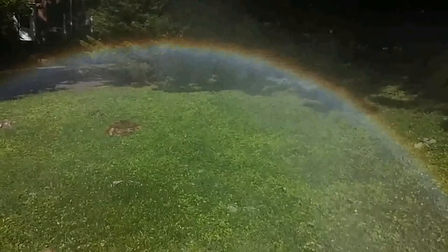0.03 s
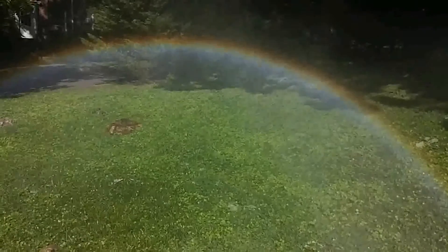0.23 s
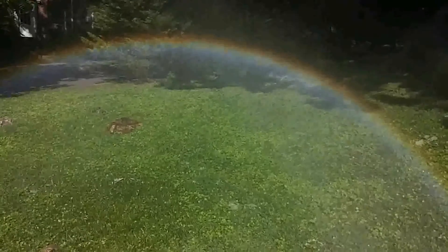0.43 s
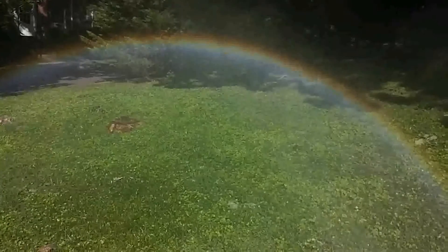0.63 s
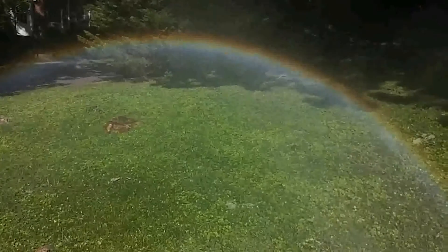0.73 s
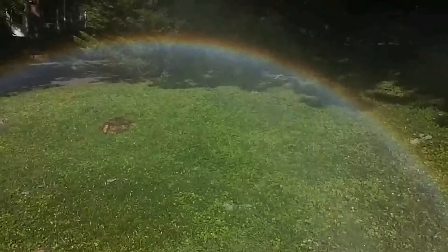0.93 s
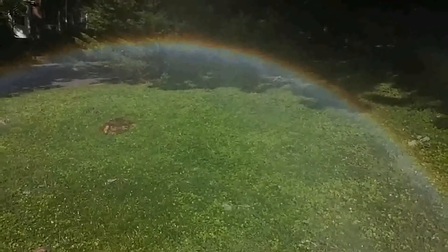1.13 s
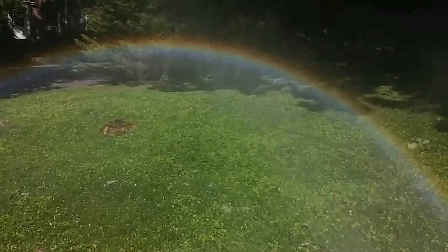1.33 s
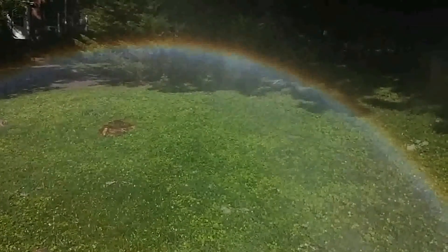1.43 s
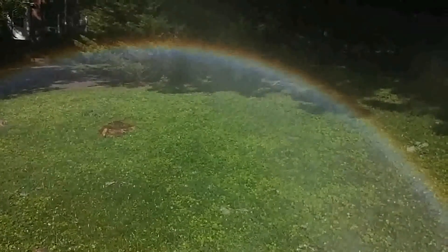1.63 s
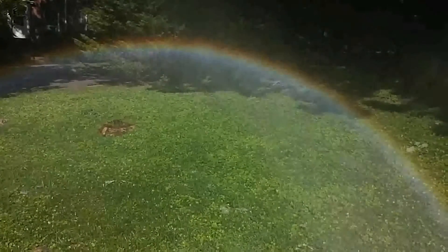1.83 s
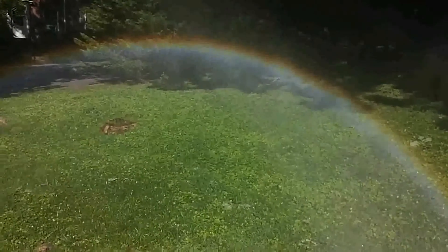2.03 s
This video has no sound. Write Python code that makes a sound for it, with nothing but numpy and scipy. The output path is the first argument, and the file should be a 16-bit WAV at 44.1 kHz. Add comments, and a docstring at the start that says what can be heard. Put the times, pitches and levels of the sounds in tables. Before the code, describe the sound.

Steady sprinkler hiss with drops pattering on a lawn and a light breeze.

```python
"""A lawn sprinkler throws a fine spray over grass. Countless droplets merge into a steady hiss,
heavier drops spatter with a short hollow ring, and the splashing swells as the spray drifts closer.
Behind it are a distant outdoor hum and three faint whistles. A light breeze rumbles on a hand-held
recorder whose two microphone openings colour the sound differently."""
import sys
import numpy as np
from scipy import signal
from scipy.fft import rfft, irfft
from scipy.io import wavfile
from scipy.ndimage import uniform_filter1d, map_coordinates

SR = 44100
rng = np.random.default_rng(int(sys.argv[2]) if len(sys.argv) > 2 else 0)


def bounce(signal):
    """Save signal as a 16-bit WAV file at the path given by the first command-line argument."""
    frames = np.transpose(np.atleast_2d(signal))
    limited = np.clip(frames, -1, 1)
    pcm = np.round(limited * 32767).astype(np.int16)
    wavfile.write(sys.argv[1], SR, pcm)


N = 91860
TIME = np.arange(N) / SR


def undb(db):
    """Turn decibels into a number to multiply by."""
    return 10 ** (np.asarray(db) / 20)


def curve(rows):
    """A changing volume, drawn through (seconds, dB) points."""
    return undb(np.interp(TIME, *np.array(rows).T))


def colour(x, rows):
    """Make some frequencies louder and others softer, following (Hz, dB) points."""
    hz, db = np.array(rows).T
    freqs = np.maximum(np.fft.rfftfreq(N, 1 / SR), 1)
    return irfft(rfft(x) * undb(np.interp(np.log(freqs), np.log(hz), db)), N)


def shaped(x, rows):
    """Give white sound of level 1 the tone set by (Hz, dB per Hz) points."""
    return colour(x, rows) * np.sqrt(SR / 2)


def wobble(per_s):
    """Glide to a new random value per_s times a second; typical size 1."""
    step = int(SR / per_s)
    held = np.repeat(rng.standard_normal(N // step + 1), step)
    glide = uniform_filter1d(held, step)[:N]
    return glide / glide.std()


def wide(make, shared):
    """A wide sound: the shared part reaches both sides, the rest only one."""
    return np.sqrt(shared) * make() + np.sqrt(1 - shared) * np.array([make(), make()])


def noise():
    """White noise of level 1."""
    return rng.standard_normal(N)


def impacts(per_s, spread_db):
    """Randomly timed clicks of uneven size; overall level 1."""
    clicks = (rng.random(N) < per_s / SR) * np.sign(noise()) * undb(spread_db * noise())
    return clicks / clicks.std()


def patchy(x, db, patch_hz=170, patch_s=.022):
    """Let narrow frequency bands flicker, each on its own, keeping the average power."""
    freqs, times, bands = signal.stft(x, SR, nperseg=512)
    grid = np.meshgrid(freqs / patch_hz, times / patch_s, indexing="ij")
    flicker = map_coordinates(rng.standard_normal((256, 256)), grid, order=1, mode="wrap")
    gain = undb(db * flicker / flicker.std())
    return signal.istft(bands * gain / np.sqrt(np.mean(gain ** 2)), SR)[1][..., :N]


# The tone of the settled mist. Each row: frequency in Hz, strength in dB per Hz.
MIST_TONE = [(300, -105), (750, -82), (1000, -75.5), (1300, -77.5), (1600, -74.5), (1900, -74),
             (2150, -69.5), (2450, -63), (2750, -69.5), (3300, -71), (4000, -75), (5000, -73.5),
             (6000, -76.5), (6800, -74), (7350, -67.5), (8200, -71.5), (9000, -66.5), (10200, -73.5),
             (11200, -71), (13200, -73), (14600, -71.5), (15800, -75.5)]
# The slight rise and fall of its hiss. Each row: time in seconds, level change in dB.
MIST_SWELL = [(0, .4), (.08, 1.3), (.65, .4), (1.15, -.8), (1.35, -.2), (2.08, -.4)]


def mist(start_sharp=.055, settle_s=.35):
    """Fine droplets merge into a flickering hiss whose tone sinks as the jet settles."""
    droplets = wide(lambda: impacts(per_s=30000, spread_db=2) + noise(), shared=.51) / np.sqrt(2)
    freqs, times, bands = signal.stft(droplets, SR, nperseg=512)
    hz, db = np.array(MIST_TONE).T
    pitch_ratio = 1 + start_sharp * np.exp(-times / settle_s)
    band_db = np.interp(np.log((freqs[:, None] + 1) / pitch_ratio), np.log(hz), db)
    hiss = signal.istft(bands * undb(band_db) * np.sqrt(SR / 2), SR)[1][:, :N]
    flicker_db = .41 * (wobble(per_s=29.85) + wobble(per_s=200))
    return patchy(hiss, db=1.9) * curve(MIST_SWELL) * undb(flicker_db)


def ring(t, usual_hz=2407, scatter=.042, attack_s=.00043, decay_s=.0034):
    """One drop's hollow ring, t seconds after it lands; each drop has its own pitch."""
    t = np.maximum(t, 0)
    hz = usual_hz * (1 + scatter * rng.standard_normal())
    envelope = np.exp(-t / decay_s) * (1 - np.exp(-t / attack_s))
    return envelope / envelope.max() * np.sin(2 * np.pi * hz * t)


def drop_rings(per_s=600, spread_db=4.5):
    """Many drops of uneven size ring at random moments; overall level 1."""
    t = TIME[:512]
    drops = np.zeros(N + len(t))
    for start in rng.integers(0, N, int(per_s * N / SR)):
        drops[start:start + len(t)] += undb(spread_db * rng.standard_normal()) * ring(t)
    return drops[:N] / drops.std()


# Flurries of heavier drops. Each row: time in seconds, level in dB before the boost.
FLURRIES = [(0, -46), (.16, -45.5), (.23, -39), (.3, -52), (.42, -48), (.53, -45), (.56, -33.5), (.66, -40),
            (.72, -46), (.85, -54.5), (.94, -37.5), (1.05, -40), (1.34, -47), (1.4, -40), (1.5, -43),
            (1.8, -37), (1.93, -42), (1.99, -37), (2.08, -46)]


def spatter(boost_db=3.5):
    """The heavier drops come down in flurries."""
    return wide(drop_rings, shared=.95) * curve(FLURRIES) * undb(boost_db)


# The tones of dull and bright splashing. Each row: frequency in Hz, strength in dB per Hz.
DULL_TONE = [(700, -99), (1050, -68.5), (1350, -71), (1650, -64.5), (1950, -70), (2250, -62), (2700, -75),
             (4000, -82)]
BRIGHT_TONE = [(1800, -92.5), (2700, -69), (3250, -61), (3900, -71.5), (5000, -76), (6800, -81),
               (7300, -65.5), (7900, -80), (9000, -87)]
# How each one surges. Each row: time in seconds, level change in dB.
DULL_SWELL = [(0, -16.5), (1.25, -8.5), (1.41, -5), (1.51, -8), (1.63, -8), (1.69, -1), (1.77, -6.5),
              (1.87, -2), (1.96, -0.5), (2.08, -4)]
BRIGHT_SWELL = [(0, -15), (1.36, -12), (1.43, 0), (1.5, -9.5), (1.62, -3.5), (1.67, -7), (1.71, -4.5),
                (1.8, 1), (1.88, -3), (2.03, -3.5), (2.08, 2)]


def splashing(tone, swell):
    """Coarser spray lands on the nearby grass in sputtering surges."""
    hits = wide(lambda: impacts(per_s=6500, spread_db=2), shared=.39)
    return patchy(shaped(hits, tone), db=2.8) * curve(swell)


# The tone of the breeze. Each row: frequency in Hz, strength in dB per Hz.
BREEZE_TONE = [(20, -90), (36, -78), (56, -65.5), (75, -70), (108, -69), (140, -80.5), (250, -94.5),
               (500, -120)]
# Its gusts. Each row: time in seconds, level change in dB.
BREEZE_GUSTS = [(0, -2), (.06, -2), (.13, 3.5), (.3, -4), (.39, 2), (.46, -6), (.54, 1.5), (.75, -4.5),
                (1.0, -2), (1.12, -5), (1.2, 1), (1.41, 1), (1.46, -12), (1.62, -1), (1.85, 3), (1.95, 0),
                (2.08, 3)]


def breeze():
    """Soft gusts rumble on the microphone."""
    return shaped(wide(noise, shared=.86), BREEZE_TONE) * curve(BREEZE_GUSTS)


# The tone of the outdoor hum. Each row: frequency in Hz, strength in dB per Hz.
HUM_TONE = [(20, -85), (100, -79), (180, -77), (260, -83), (310, -80.5), (380, -83), (450, -75),
            (560, -84.5), (750, -91), (1500, -100), (4000, -120)]
# Its rise and fall. Each row: time in seconds, level change in dB.
HUM_SWELL = [(0, -0.5), (1.2, 0), (1.5, -0.5), (1.8, -1), (1.93, 1.5), (2.08, -0.5)]


def outdoor_hum():
    """The distant surroundings make a low, wavering hum."""
    hum = shaped(wide(noise, shared=.78), HUM_TONE)
    return patchy(hum, db=2.5) * curve(HUM_SWELL)


# Faint whistles. Each row: start in seconds, length in seconds, pitch in Hz, level in dB.
FAINT_WHISTLES = [(.08, .07, 2105, -39), (.195, .04, 2650, -34), (.425, .075, 2105, -33)]


def whistle(start, length, hz, db):
    """One short, slightly wavering whistle fades in and out."""
    progress = np.clip((TIME - start) / length, 0, 1)
    pitch = hz * (1 + .004 * wobble(per_s=87))
    return undb(db) * np.sin(np.pi * progress) * np.sin(2 * np.pi * np.cumsum(pitch) / SR)


# Puffs of wind. Each row: time of the peak in seconds, peak level in dB.
WIND_PUFFS = [(.095, -39), (1.195, -44), (1.988, -35)]


def puff(at, db, hz=71.6, width_s=.012):
    """A puff of wind bumps the microphone with a low thud."""
    envelope = np.exp(-((TIME - at) / width_s) ** 2)
    return undb(db) * envelope * np.sin(2 * np.pi * (hz * TIME + rng.random()))


# Single fat drops. Each row: start in seconds, peak level in dB.
FAT_DROP_HITS = [(0.554, -19.5), (0.564, -29), (1.027, -21), (1.389, -25), (1.778, -23), (1.883, -18),
                 (1.983, -19.5), (2.022, -17.5)]


def fat_drops():
    """A few fat drops ring out above the spatter."""
    return sum(undb(db) * ring(TIME - start) for start, db in FAT_DROP_HITS)


def scene(left_lag_s=.0002786):
    """All the sounds together; they reach the left opening a moment after the right."""
    water = mist() + spatter() + fat_drops()
    water += splashing(DULL_TONE, DULL_SWELL) + splashing(BRIGHT_TONE, BRIGHT_SWELL)
    wind = breeze() + sum(puff(*row) for row in WIND_PUFFS)
    background = outdoor_hum() + sum(whistle(*row) for row in FAINT_WHISTLES)
    left, right = water + wind + background
    delay = np.exp(-2j * np.pi * np.fft.rfftfreq(N, 1 / SR) * left_lag_s)
    return np.array([irfft(rfft(left) * delay, N), right])


# How each microphone opening colours the sound. Each row: frequency in Hz, level change in dB.
LEFT_TONE = [(5800, 0), (6800, -2.5), (7300, -7.5), (8200, -1.5), (9000, -10), (10200, -5), (11100, -24.5),
             (11700, -17), (13100, -22), (14200, -40)]
RIGHT_TONE = [(700, -3.5), (1000, -12.5), (1400, -12.5), (1750, -15.5), (2100, -14.5), (2500, -7.5),
              (3100, -13.5), (3550, -5.5), (4100, -7), (4400, -4), (4560, -16), (4720, -31), (5000, 2),
              (5500, -7.5), (5900, -0.5)]


def record(dry, top_hz=15850):
    """The left opening sounds dull, the right thin and uneven; the highest treble is cut steeply."""
    sides = np.array([colour(dry[0], LEFT_TONE), colour(dry[1], RIGHT_TONE)])
    treble_cut = signal.ellip(12, .1, 80, top_hz, fs=SR, output="sos")
    return signal.sosfilt(treble_cut, sides)


dry = scene()
out = record(dry)
bounce(out)
```